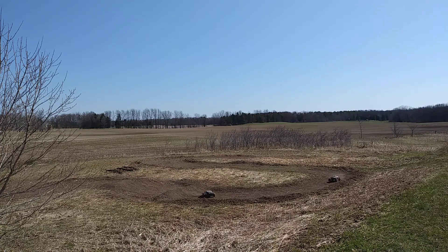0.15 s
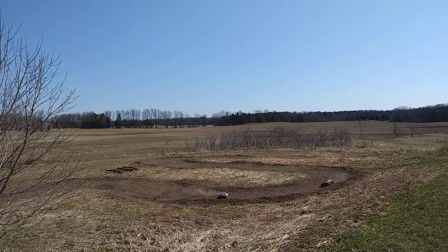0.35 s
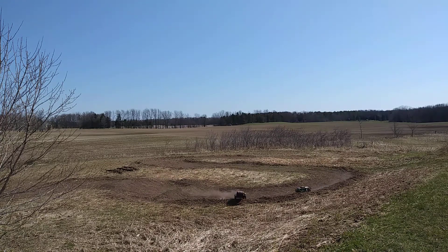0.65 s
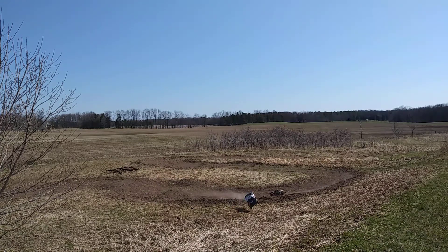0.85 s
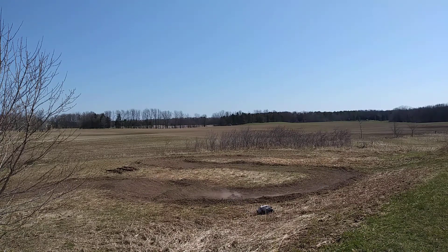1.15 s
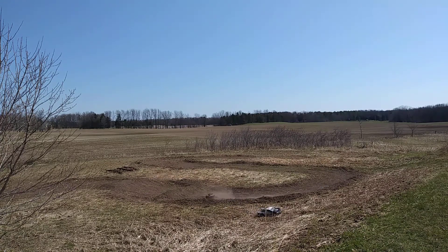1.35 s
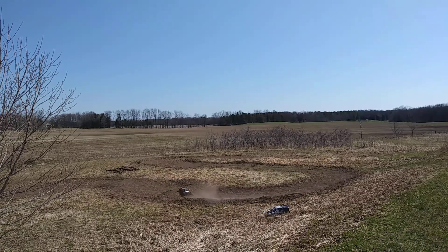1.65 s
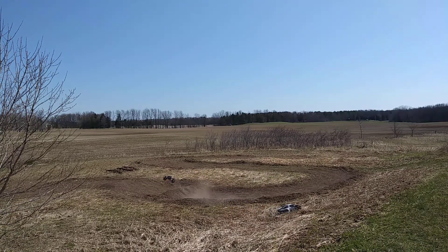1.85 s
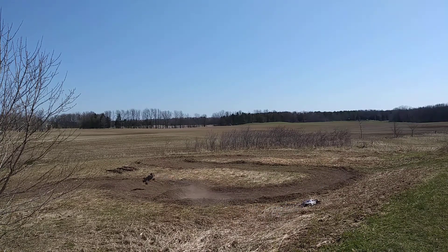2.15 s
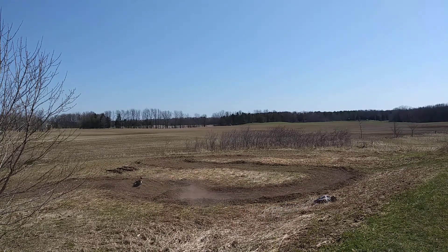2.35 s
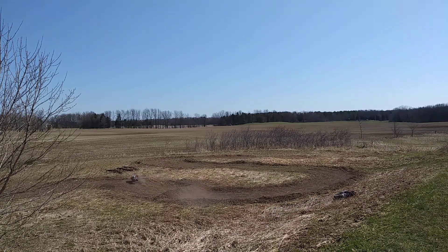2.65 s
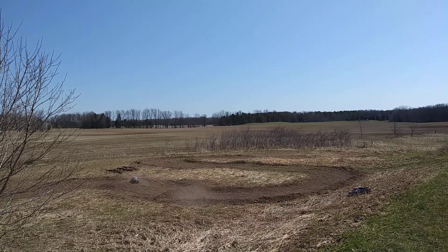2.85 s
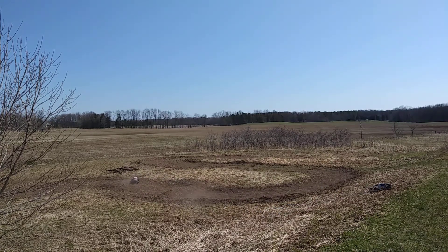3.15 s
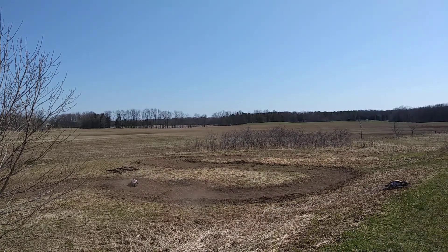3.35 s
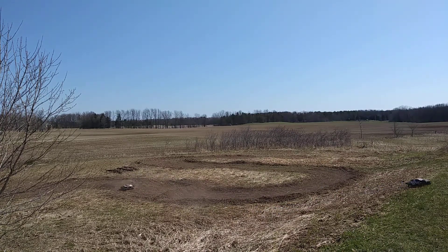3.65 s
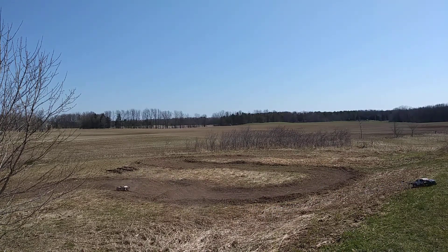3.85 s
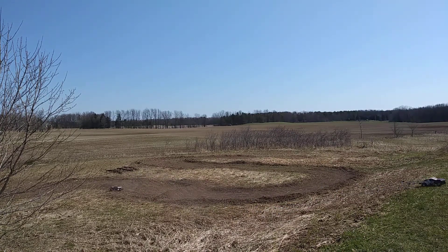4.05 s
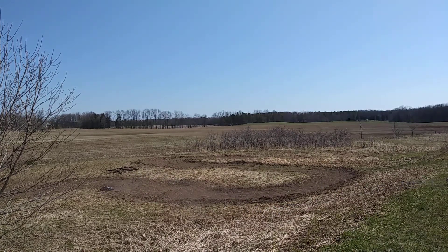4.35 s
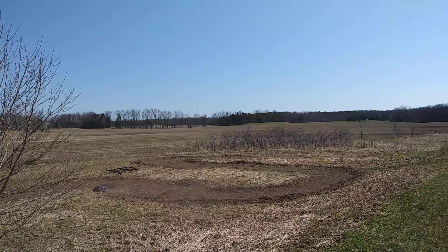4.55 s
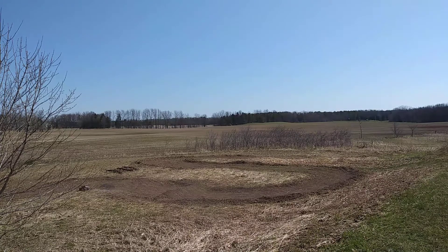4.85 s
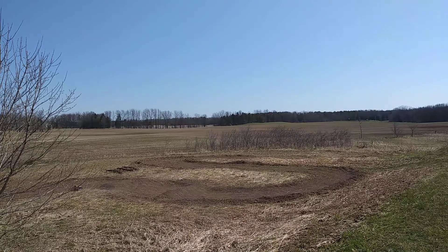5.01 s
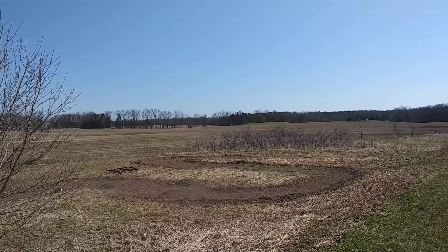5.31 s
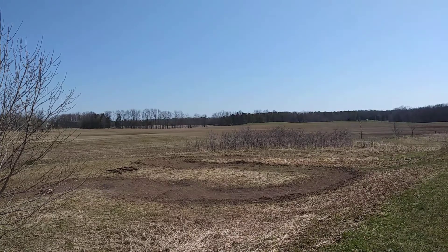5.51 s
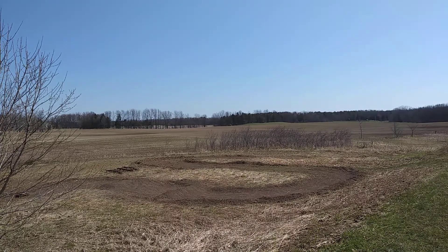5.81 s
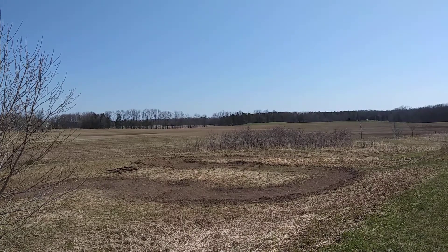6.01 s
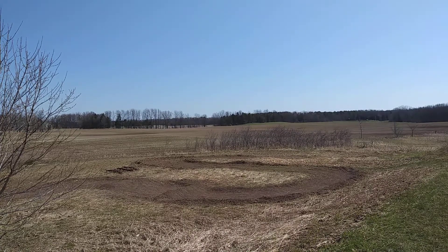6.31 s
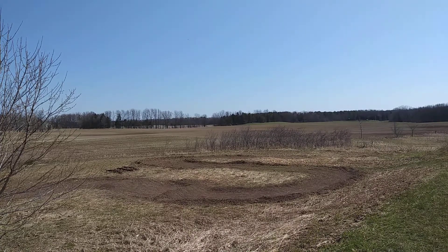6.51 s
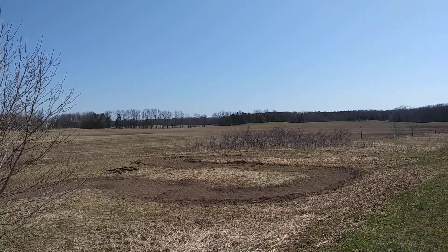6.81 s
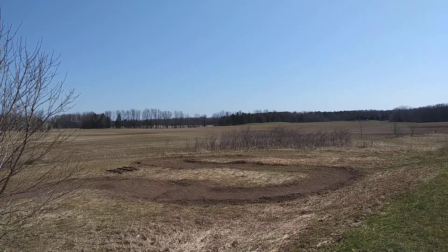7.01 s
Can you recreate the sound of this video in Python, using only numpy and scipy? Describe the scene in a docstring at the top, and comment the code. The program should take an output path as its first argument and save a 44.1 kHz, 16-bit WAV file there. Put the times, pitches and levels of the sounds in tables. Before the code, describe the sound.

Two small electric trucks race on dirt in an open field, heard from some way off. Gear chatter and tyre roar swell to a rattling hard landing just after half a second, then wheelspin, scraping and broken motor whines come and go. Wind thumps a hand-held microphone; a songbird whistles in the gaps. The trucks thin out and fade to near silence.

```python
"""Two small electric trucks race round a dirt track in an open field, some way from a hand-held microphone.
Drivetrains, tyres, thrown soil and landings are coloured noise; whine, hum and throttle blips are gliding
sines; howl is narrow noise. A songbird whistles in gliding sines. Low noise bursts and ringing clicks
make the wind on the microphone, over a faint hush of the field."""
import sys
import numpy as np
from scipy import signal
from scipy.fft import rfft, irfft, next_fast_len
from scipy.io import wavfile
from scipy.ndimage import uniform_filter1d

SR = 44100
rng = np.random.default_rng(int(sys.argv[2]) if len(sys.argv) > 2 else 0)


def volts_from_decibels(level):
    """Turn decibel levels (scalar or array-like) into linear amplitude factors."""
    exponent = np.asarray(level, float) / 20
    return 10 ** exponent


def unload_wav(signal):
    """Save mono or channel-first audio to the path in sys.argv[1] as 16-bit WAV at rate SR, clipped to [-1, 1]."""
    wavfile.write(
        sys.argv[1],
        SR,
        np.round(np.clip(np.atleast_2d(signal).T, -1, 1) * 32767).astype(np.int16),
    )


N = 316183


def rms_one(x):
    """Scale to rms 1."""
    return x / np.sqrt(np.mean(x ** 2) + 1e-20)


def in_time(rows):
    """Interpolate the columns of a curve, sample by sample."""
    time_s, *columns = np.transpose(rows)
    return [np.interp(np.arange(N) / SR, time_s, column) for column in columns]


def drift(rate_hz):
    """Slow random signal, rms 1: noise through a double pole at rate_hz, one value per 40 samples."""
    r = np.exp(-80 * np.pi * rate_hz / SR)
    noise = rng.standard_normal(N // 40 + 2002)
    slow = signal.lfilter([1], [1, -2 * r, r * r], noise)[2000:]
    return np.interp(np.arange(N) / 40, np.arange(len(slow)), rms_one(slow))


def grains(per_s, spread_db, smooth):
    """Random clicks of uneven size over smooth noise."""
    sizes = volts_from_decibels(spread_db * np.minimum(rng.exponential(1, N), 5))
    sizes = sizes * rng.choice([-1, 1], N)
    clicks = sizes * (rng.random(N) < per_s / SR)
    return rms_one(clicks) + smooth * rng.standard_normal(N)


def coloured(x, spectrum, patchy_db, rate_hz, per_octave=5):
    """Shape x by spectrum in narrow bands, each with its own level flicker; rms 1."""
    hz, db = np.transpose(spectrum)
    size = next_fast_len(N)
    f = np.fft.rfftfreq(size, 1 / SR)
    shaped = rfft(x, size) * volts_from_decibels(np.interp(np.log(f + 1), np.log(hz), db, left=-90, right=-90))
    place = per_octave * np.log2((f + 1) / hz[0])
    out = 0
    for k in range(int(per_octave * np.log2(hz[-1] / hz[0])) + 2):
        window = np.cos(np.pi / 2 * np.clip(place - k, -1, 1)) ** 2
        band = irfft(shaped * window, size)[:N]
        out = out + band * volts_from_decibels(patchy_db * drift(rate_hz))
    return rms_one(out)


def resonance(x, hz, width_hz):
    """Two-pole resonance, gain 1 on top."""
    r = np.exp(-np.pi * width_hz / SR)
    poles = [1, -2 * r * np.cos(2 * np.pi * hz / SR), r * r]
    return signal.lfilter(np.array([1, 0, -1]) * (1 - r * r) / 2, poles, x)


def bursts(rows):
    """Sum of Gaussian envelopes; half_s is the standard deviation."""
    out = np.zeros(N)
    for time_s, db, half_s in rows:
        at = np.arange(max(int((time_s - 6 * half_s) * SR), 0), min(int((time_s + 6 * half_s) * SR), N))
        out[at] += volts_from_decibels(db) * np.exp(-.5 * np.abs((at / SR - time_s) / half_s) ** 2)
    return out


def tones(tables, wobble, rate_hz, flutter_db, edge_s):
    """Gliding sines with unsteady pitch and level, faded at both ends."""
    out = np.zeros(N)
    shake = 1 + wobble * drift(rate_hz)
    flutter = volts_from_decibels(2 * flutter_db * np.tanh(drift(rate_hz) / 2))
    for rows in tables:
        time_s, hz, db = np.transpose(rows)
        at = np.arange(max(int(time_s[0] * SR), 0), min(int(time_s[-1] * SR), N))
        t = at / SR
        fade = np.clip(np.minimum(t - time_s[0], time_s[-1] - t) / edge_s, 0, 1)
        phase = 2 * np.pi * np.cumsum(np.interp(t, time_s, hz) * shake[at]) / SR
        level = np.sqrt(2) * volts_from_decibels(np.interp(t, time_s, db))  # table levels are rms
        out[at] += level * fade * flutter[at] * np.sin(phase)
    return out


GLIDE_EASE = 0.476  # share of a glide done at half its length


def glides(rows, change_db):
    """Turn (start, length, from, to, level) rows into three-point curves for tones()."""
    curves = []
    for start_s, length_s, from_hz, to_hz, db in rows:
        middle_hz = from_hz + GLIDE_EASE * (to_hz - from_hz)
        curves.append([(start_s, from_hz, db),
                       (start_s + length_s / 2, middle_hz, db + change_db / 2),
                       (start_s + length_s, to_hz, db + change_db)])
    return curves


# near shell and ground echo: (frequency [Hz], relative density [dB per Hz])
NEAR_SPECTRUM = [(760, -14.5), (1300, -3), (1660, -1.5), (1900, 7), (2260, -0.5), (2500, 5.5), (2790, -0.5),
                 (3750, -6), (4200, -38.5), (5460, -32.5), (9240, -120)]


def near_drivetrain():
    """Grainy gear chatter in the colour of the shell and its ground echo."""
    return coloured(grains(2500, spread_db=0.0, smooth=0.94), NEAR_SPECTRUM, patchy_db=3.3, rate_hz=8.0, per_octave=10)


# far shell and ground echo: (frequency [Hz], relative density [dB per Hz])
FAR_SPECTRUM = [(500, -33.5), (740, 5.5), (1000, -17.5), (1350, -1.5), (1650, -4), (1950, -37.5),
                (2400, -8), (2750, 0.5), (3300, 3), (3700, -13), (4100, -6), (4600, -19), (5200, -33.5),
                (6000, -41)]


def far_drivetrain():
    """Smooth noise in the colour of the far shell, with fast level chatter."""
    body = coloured(rng.standard_normal(N), FAR_SPECTRUM, patchy_db=4.5, rate_hz=11.2, per_octave=10)
    return body * volts_from_decibels(1.72 * drift(49))


# tyre roar: (frequency [Hz], relative density [dB per Hz])
TYRE_SPECTRUM = [(260, -53.5), (450, -25), (628, 8), (863, 2.5), (997, 8.5), (1450, -6.5), (1700, 2.5),
                 (2210, -48.5), (3740, -120)]


def tyre_roar():
    """Tyres on dirt: sparse grains under dense noise."""
    return coloured(grains(690, spread_db=-3.5, smooth=5.2), TYRE_SPECTRUM, patchy_db=3.5, rate_hz=7.2, per_octave=6)


# wheels spin up and fling grit: (start [s], end [s], level at end [dB])
SPINS = [(0.0, 0.31, -65.5), (0.557, 0.69, -64), (1.63, 2.136, -54.5), (2.383, 2.405, -61),
         (2.538, 2.622, -66), (2.72, 2.75, -62), (2.815, 2.887, -62), (3.315, 3.386, -63),
         (3.45, 3.44, -83), (4.11, 4.154, -57.5), (4.18, 4.396, -61), (6.568, 6.654, -59),
         (6.754, 6.763, -71)]
SPIN_RISE_DB_PER_S, SPIN_BUILD_DB_PER_S, SPIN_FALL_DB_PER_S = 261, 12, 422.5


def wheelspin():
    """Grit envelope: each spin rises quickly, builds slowly to its end and falls away."""
    t = np.arange(N) / SR
    out = 0
    for start_s, end_s, db in SPINS:
        lost_db = SPIN_RISE_DB_PER_S * np.maximum(start_s - t, 0)
        lost_db = lost_db + SPIN_BUILD_DB_PER_S * np.maximum(end_s - t, 0)
        lost_db = lost_db + SPIN_FALL_DB_PER_S * np.maximum(t - end_s, 0)
        out = out + volts_from_decibels(db - lost_db)
    return out


# coarse soil, fine grit: (frequency [Hz], relative density [dB per Hz])
SPRAY_SPECTRUM = [(2060, -41), (3500, 3), (3750, 1.5), (4280, -3), (4700, -2), (5250, -4), (5660, -9),
                  (6270, -18.5), (7200, -50.5), (9360, -56), (15800, -120)]
GRIT_SPECTRUM = [(4000, -28.5), (6800, 4.5), (7400, 2.5), (8130, -4.5), (9240, -11), (10100, -13.5),
                 (11100, -11), (12000, -17.5), (15500, -25)]
SPRAY_NEAR_DB, SPRAY_FAR_DB, GRIT_NEAR_DB = -22, -12.5, -32.5  # against each drivetrain
SPIN_SPRAY_DB = 8.5  # against the spin grit


def thrown_soil(near_db, far_db):
    """Impacts of soil and grit, following the drivetrains and the wheelspin."""
    spin = wheelspin()
    thrown = grains(4000, spread_db=4.0, smooth=2.0)
    spray = coloured(thrown, SPRAY_SPECTRUM, patchy_db=1.5, rate_hz=4.9, per_octave=12)
    grit = coloured(thrown, GRIT_SPECTRUM, patchy_db=2.5, rate_hz=6, per_octave=16)
    grit = grit * volts_from_decibels(1.2 * drift(25))  # thrown in clumps
    spray_level = volts_from_decibels(near_db + SPRAY_NEAR_DB) + volts_from_decibels(far_db + SPRAY_FAR_DB) + volts_from_decibels(SPIN_SPRAY_DB) * spin
    grit_level = volts_from_decibels(near_db + GRIT_NEAR_DB) + spin
    return spray * spray_level + grit * grit_level


# levels before the shake: (time [s], near drivetrain [dB], far drivetrain [dB], tyre roar [dB])
TRUCK_LEVELS = [(0.0, -40.5, -46.5, -41), (0.5, -37, -48.5, -47), (0.64, -34, -49, -42.5),
                (0.74, -34, -46, -42.5), (1.0, -42, -47, -50), (1.42, -43, -47.5, -49),
                (1.62, -40.5, -42, -37.5), (2.05, -36.5, -54.5, -41.5), (2.23, -43.5, -46, -45),
                (2.8, -48, -58, -44.5), (3.11, -49.5, -52, -51.5), (3.37, -40.5, -42, -46),
                (3.57, -60.5, -57, -61.5), (3.75, -54, -66, -58), (3.95, -43.5, -45.5, -43),
                (4.39, -45.5, -47.5, -50.5), (4.8, -47, -51.5, -51.5), (5.1, -60.5, -60, -66.5),
                (5.57, -50, -49.5, -54), (5.87, -46, -46.5, -53.5), (6.23, -52.5, -47, -62),
                (6.63, -47, -43.5, -47.5), (6.85, -51, -46, -56.5), (7.05, -63.5, -63.5, -62.5),
                (7.17, -70, -62, -65.5)]


def rolling():
    """Rough ground shakes drivetrains, tyres and thrown soil together."""
    near_db, far_db, tyre_db = in_time(TRUCK_LEVELS)
    shake = volts_from_decibels(1.4 * drift(38))
    drivetrains = volts_from_decibels(near_db) * near_drivetrain() + volts_from_decibels(far_db) * far_drivetrain()
    return shake * (drivetrains + volts_from_decibels(tyre_db) * tyre_roar() + thrown_soil(near_db, far_db))


# throttle held, then even throttle; levels before flutter: (time [s], pitch [Hz], level [dB])
WHINE = [
    [(0.08, 1850, -53), (0.14, 1770, -36), (0.2, 1737, -36), (0.26, 1850, -54), (0.42, 1850, -40),
     (0.52, 1770, -46)],
    [(1.73, 1872, -45), (1.78, 1792, -42), (1.85, 1890, -44), (1.95, 1960, -55), (2.045, 1860, -45),
     (2.095, 2050, -42)],
    [(2.53, 1916, -40), (2.56, 1800, -52), (2.588, 2130, -42), (2.603, 1922, -60), (2.622, 2080, -36),
     (2.655, 1482, -51), (2.705, 1940, -45.5), (2.745, 2050, -41.5), (2.785, 1837, -49.5),
     (2.838, 2170, -43), (2.9, 2150, -52)],
    [(3.25, 1388, -49), (3.29, 1980, -49), (3.315, 2080, -34), (3.335, 2220, -43), (3.37, 2420, -52)],
    [(3.29, 3070, -44), (3.305, 2950, -44), (3.322, 3170, -43), (3.342, 2740, -45)],
    [(4.01, 1981, -54), (4.065, 1883, -45), (4.12, 2330, -45), (4.18, 2740, -43), (4.28, 2100, -44),
     (4.31, 2420, -45), (4.39, 2280, -45), (4.41, 2000, -28)],
]
STEADY_WHINE = [
    [(4.485, 1502, -57), (4.515, 1948, -36), (4.58, 1926, -35.5), (4.6, 2040, -58), (4.61, 1880, -51),
     (4.655, 1905, -48)],
    [(4.745, 1980, -50), (4.772, 1858, -35), (4.79, 1980, -35), (4.805, 2060, -49), (4.835, 2010, -43),
     (4.875, 1860, -50)],
]


def gear_whine():
    """Gear mesh tones; the teeth mesh unevenly except at an even throttle."""
    held = tones(WHINE, wobble=0.024, rate_hz=90, flutter_db=3.5, edge_s=0.006)
    held = held * (0.8 + 0.6 * drift(70))
    return held + tones(STEADY_WHINE, wobble=0.014, rate_hz=45, flutter_db=1.8, edge_s=0.006)


# levels before flutter: (start [s], length [s], from [Hz], to [Hz], start level [dB])
BLIPS = [(0.52, 0.063, 3130, 3180, -40), (3.11, 0.056, 3180, 3400, -50), (0.7, 0.064, 1705, 1220, -42),
         (1.525, 0.065, 1486, 2250, -44), (1.6, 0.022, 3000, 3320, -38.5),
         (1.632, 0.026, 3500, 4050, -43.5), (2.62, 0.018, 3520, 3120, -50), (2.66, 0.039, 3170, 3620, -52),
         (3.15, 0.075, 1730, 2340, -44), (3.243, 0.04, 2850, 2420, -43)]


def throttle_blips():
    """Short blips of the throttle sweep the whine."""
    return tones(glides(BLIPS, change_db=-2), wobble=0.016, rate_hz=70, flutter_db=3.0, edge_s=0.005)


# gearbox under load, levels before flutter: (time [s], centre [Hz], level [dB])
HOWL = [
    [(0.0, 4770, -47), (0.15, 4540, -55), (0.3, 4900, -57)],
    [(0.05, 2990, -47), (0.2, 3350, -52), (0.3, 3200, -53)],
    [(1.45, 3090, -46), (1.62, 3145, -43), (1.78, 3100, -42)],
    [(1.7, 2800, -39), (1.87, 2700, -44), (2.03, 2610, -47), (2.17, 2550, -42)],
    [(1.75, 3450, -50), (1.95, 3710, -40), (2.2, 3720, -63)],
    [(1.62, 5000, -59), (1.8, 5060, -48), (2.02, 5300, -56), (2.15, 5140, -61)],
    [(5.7, 5100, -68), (5.9, 5140, -56.5), (6.1, 5220, -61), (6.3, 5100, -77)],
    [(5.3, 3280, -55.5), (5.7, 3230, -61), (6.1, 3390, -75), (6.45, 3370, -50)],
    [(5.7, 2890, -53), (5.95, 2783, -46.5), (6.13, 2820, -42.5), (6.25, 3003, -54.5), (6.4, 3150, -43.5),
     (6.5, 2940, -53), (6.7, 3000, -51)],
    [(5.75, 2470, -53), (5.87, 2550, -44), (5.98, 2420, -54)],
    [(5.55, 1063, -56.5), (5.85, 1160, -54.5), (6.1, 1354, -60), (6.35, 1368, -60)],
]
HOWL_WIDTH_SHARE = .075  # modulation rate against the first centre frequency


def howl():
    """Rough bands: a gliding tone times slow noise gives narrow noise about a moving centre."""
    out = 0
    for band in HOWL:
        centre = tones([band], wobble=0.00654, rate_hz=24.6, flutter_db=1.5, edge_s=0.029)
        out = out + centre * drift(HOWL_WIDTH_SHARE * band[0][1])
    return out


# levels before flutter: (time [s], pitch [Hz], level [dB])
HUM = [
    [(6.0, 698, -58), (6.3, 746.6, -53), (6.5, 775, -72), (6.9, 778, -69)],
]


def far_hum():
    """Low unsteady hum of the far truck."""
    return tones(HUM, wobble=0.0286, rate_hz=52.0, flutter_db=5.5, edge_s=0.025)


# landings: (time [s], rattle level [dB], Gaussian deviation [s])
BUMPS = [(.595, -26.5, 0.009), (0.635, -23.5, 0.012), (0.67, -24.5, 0.011), (0.694, -28.5, 0.0036),
         (0.754, -32, 0.012), (0.961, -36, 0.022), (1.14, -38, 0.015)]
# shell rattle: (frequency [Hz], relative density [dB per Hz])
RATTLE_SPECTRUM = [(500, -15), (900, -24), (1550, -39), (1750, 6.5), (2100, 3), (2400, 0), (2800, 0.5),
                   (3100, -14), (4700, -18), (9000, -43)]
# stones hitting the shell: (time [s], level [dB], Gaussian deviation [s])
STONES = [(2.368, -34.5, 0.0015)]
CRACK_DB = -21  # stones cracking under a landing, against the rattle


def landings():
    """Landings rattle the shell and crack stones; a stone hits the shell."""
    rattle = coloured(grains(3000, spread_db=2.5, smooth=0.9), RATTLE_SPECTRUM, patchy_db=1.0, rate_hz=10, per_octave=3)
    crack = rms_one(resonance(resonance(rng.standard_normal(N), 3900, 2800), 3900, 2800))
    return bursts(BUMPS) * (rattle + volts_from_decibels(CRACK_DB) * crack) + bursts(STONES) * crack


# chassis grounds out: (time [s], level [dB], Gaussian deviation [s])
SCRAPES = [(2.296, -32.5, 0.0054), (2.317, -36, 0.008), (2.35, -31.5, 0.005), (2.368, -35.5, 0.0084),
           (2.393, -33.5, 0.0087)]
# scrape: (frequency [Hz], relative density [dB per Hz])
SCRAPE_SPECTRUM = [(500, -4), (900, 1.5), (1500, 0), (3000, -2.5), (4000, -12), (9000, -44)]


def scrapes():
    """Grainy noise bursts as the chassis drags on the ground."""
    noise = coloured(grains(2500, spread_db=2.5, smooth=0.6), SCRAPE_SPECTRUM, patchy_db=1.5, rate_hz=30, per_octave=2)
    return bursts(SCRAPES) * noise


def trucks():
    """Both trucks: rolling noise, gear tones and impacts."""
    gears = gear_whine() + throttle_blips() + howl() + far_hum()
    return rolling() + gears + landings() + scrapes()


# phrase notes: (time after phrase start [s], length [s], from [Hz], to [Hz], start level [dB])
PHRASE = [(0.0, 0.029, 2700, 3040, -39.5), (0.026, 0.039, 2774, 2726, -34.5),
          (0.076, 0.077, 2054, 1884, -48), (.152, .09, 2620, 2410, -45), (0.258, 0.06, 1880, 1770, -47.5)]
# phrase starts: (time [s], level offset [dB])
PHRASES = [(2.952, -3), (5.075, -2.5)]
# single whistles: (start [s], length [s], from [Hz], to [Hz], start level [dB])
WHISTLES = [(2.392, 0.077, 2540, 2630, -49), (3.58, .11, 2514, 2610, -47.5),
            (3.73, 0.047, 2250, 1790, -55.5)]
PHRASE_FADE_DB, WHISTLE_SWELL_DB = -4, 10  # level change over each note


def songbird():
    """Clear whistled notes with a soft echo from the hedge."""
    sung = []
    for start_s, offset_db in PHRASES:
        for after_s, length_s, from_hz, to_hz, db in PHRASE:
            sung.append((start_s + after_s, length_s, from_hz, to_hz, offset_db + db))
    curves = glides(sung, PHRASE_FADE_DB) + glides(WHISTLES, WHISTLE_SWELL_DB)
    notes = tones(curves, wobble=.001, rate_hz=40, flutter_db=.5, edge_s=.005)
    return notes + volts_from_decibels(-16.0) * np.roll(notes, int(.055 * SR))


# breeze before its random swing: (time [s], level [dB])
BREEZE = [(0.0, -46), (0.32, -47), (0.68, -41), (0.96, -54.5), (1.26, -54), (1.52, -47.5), (2.93, -55.5),
          (3.47, -58), (4.01, -48), (4.51, -52), (4.65, -51.5), (5.35, -62), (5.79, -52), (6.17, -65.5),
          (6.65, -66), (7.17, -73)]
# strongest eddies on the port, before EDDY_GAIN: (time [s], level [dB], Gaussian deviation [s])
BUFFETS = [(0.058, -26.5, 0.019), (0.1, -25, 0.0088), (0.131, -29.5, 0.0068), (0.184, -24, 0.0068),
           (0.27, -25.5, 0.0087), (0.469, -25.5, 0.011), (0.558, -26, 0.0048), (0.589, -29, 0.002),
           (0.62, -29, 0.0022), (0.811, -24.5, 0.013), (0.85, -24, 0.0088), (1.49, -27.5, 0.017),
           (1.496, -23, 0.0032), (1.905, -33.5, 0.015), (2.237, -30.5, 0.0056), (2.484, -28, 0.0068),
           (2.523, -29.5, 0.015), (2.608, -29, 0.0025), (3.072, -36, 0.0031), (3.108, -39, 0.018),
           (3.168, -30.5, 0.0031), (3.555, -40, 0.025), (3.608, -30.5, 0.0045), (3.63, -32.5, 0.032),
           (3.664, -24.5, 0.0037), (3.793, -29, 0.0018), (3.925, -23, 0.0074), (3.946, -19.5, 0.0069),
           (3.995, -27.5, 0.014), (4.036, -19, 0.0078), (4.079, -20.5, 0.02), (4.134, -32.5, 0.032),
           (4.141, -29, 0.0018), (4.329, -25, 0.011), (4.403, -25, 0.0036), (4.476, -18, 0.0023),
           (4.493, -23.5, 0.0064), (4.595, -29, 0.0083), (4.846, -38, 0.0028), (5.417, -32.5, 0.0038),
           (5.439, -35, 0.0093), (5.596, -39.5, 0.02), (5.649, -35, 0.02), (5.953, -35, 0.0035),
           (5.994, -36.5, 0.016), (6.532, -39.5, 0.011), (6.782, -44.5, 0.0041)]
# eddy: (frequency [Hz], relative density [dB per Hz])
EDDY_SPECTRUM = [(65, -61.5), (110, -19), (217, -2), (464, -4.5), (572, -14), (621, -13), (1800, -42),
                 (2340, -51.5), (3960, -120)]
EDDY_GAIN = 0.41
CORE_DB, CORE_SHARE = -6, 0.58  # hard core: level against the table, length against the whole
CORE_CUT_HZ = 273  # cores lack the lowest bass


def wind():
    """Lumpy low noise: a breeze, and sudden eddies that each have a short hard core."""
    lumps = coloured(rng.standard_normal(N), EDDY_SPECTRUM, patchy_db=-0.5, rate_hz=60, per_octave=2)
    lumps = lumps / np.sqrt(uniform_filter1d(lumps ** 2, size=300))  # every eddy carries its full strength
    hard = signal.sosfilt(signal.butter(2, CORE_CUT_HZ, "high", fs=SR, output="sos"), lumps)
    hard = hard / np.sqrt(uniform_filter1d(hard ** 2, size=120))
    breeze = volts_from_decibels(in_time(BREEZE)[0] + 12.3 * np.tanh(0.7 * drift(29)))
    cores = bursts((time_s, db + CORE_DB, CORE_SHARE * half_s) for time_s, db, half_s in BUFFETS)
    return lumps * (breeze + EDDY_GAIN * bursts(BUFFETS)) + hard * cores


def rumble():
    """Faint low resonant noise that follows the breeze."""
    low = resonance(resonance(rng.standard_normal(N), 90, 60), 90, 60)
    return volts_from_decibels(-40.5 + 0.29 * in_time(BREEZE)[0]) * low


# sharpest eddies on the port: (time [s], peak level [dB])
POPS = [(0.074, -15), (0.267, -14.5), (0.471, -16.5), (0.813, -18), (0.849, -11), (0.858, -18.5),
        (1.482, -20.5), (2.237, -27.5), (2.484, -23), (3.603, -20.5), (3.921, -23.5), (3.986, -24),
        (4.039, -16), (4.072, -13), (4.136, -19.5), (4.326, -24), (4.397, -25), (4.471, -24), (5.417, -34)]
POP_HZ, POP_WIDTH_HZ = 445, 335  # each of two resonances in series


def pops():
    """One soft push each, ringing for a cycle or two."""
    time_s, db = np.transpose(POPS)
    clicks = np.zeros(N)
    clicks[(time_s * SR).astype(int)] = volts_from_decibels(db) * rng.choice([-1, 1], len(time_s))
    unit = np.zeros(SR // 20)
    unit[0] = 1
    ring = resonance(resonance(unit, POP_HZ, POP_WIDTH_HZ), POP_HZ, POP_WIDTH_HZ)
    return signal.fftconvolve(clicks, ring / np.abs(ring).max())[:N]


# field hush: (frequency [Hz], relative density [dB per Hz])
FIELD_SPECTRUM = [(120, -38), (200, -24), (1450, -25), (1730, -14.5), (2740, -20), (3690, 20), (7000, -39),
                  (9100, -66), (15400, -120)]
FIELD_DB = -66.5


def field_hush():
    """Faint, nearly steady coloured noise."""
    return volts_from_decibels(FIELD_DB) * coloured(rng.standard_normal(N), FIELD_SPECTRUM, patchy_db=0.5, rate_hz=4.8, per_octave=2)


def scene():
    """All sources at the microphone, one channel."""
    return (trucks() + songbird() + wind() + pops() + field_hush())[None]


# port cancellation: (frequency [Hz], width [Hz])
PORT_NOTCHES = [(7130, 1800), (9550, 320)]


def port(x):
    """The port weakens two treble bands by subtracting most of each resonance."""
    for hz, width_hz in PORT_NOTCHES:
        x = x - 0.87 * resonance(x, hz, width_hz)
    return x


# learned noise: (centre [Hz], width [Hz], level per bin at LEARNED_AT_S [dB])
LEARNED = [(1268, 160, -80.5), (1380, 920, -69), (1770, 140, -94), (2250, 210, -78), (2550, 130, -55.5),
           (3850, 230, -73.5), (4150, 760, -85.5), (5570, 150, -99.5), (10500, 10000, -110)]
LEARNED_AT_S, LEARNING_DB_PER_S = 6.0, 1.8


def suppress(x, floor_db):
    """Noise suppressor: each bin loses its learned noise, which digs holes wherever the sound is weak."""
    hz, time_s, bins = signal.stft(x, SR, nperseg=1024, noverlap=768)
    power = uniform_filter1d(np.abs(bins) ** 2, size=13, axis=-1) + 1e-18
    learned = 0
    for centre_hz, width_hz, db in LEARNED:
        learned = learned + volts_from_decibels(db) ** 2 * np.exp(-(2 * (hz - centre_hz) / width_hz) ** 2)
    sure = volts_from_decibels(LEARNING_DB_PER_S * (time_s - LEARNED_AT_S)) ** 2  # the estimate firms up with time
    gain = np.sqrt(np.maximum(1 - learned[:, None] * sure / power, volts_from_decibels(floor_db) ** 2))
    return signal.istft(bins * gain, SR, nperseg=1024, noverlap=768)[1][..., :N]


HISS_DB, HISS_TOP_HZ = -83, 13200  # level before the low-pass; stopband edge


def converter_hiss():
    """White noise below a steep low-pass."""
    lowpass = signal.cheby2(14, 40, HISS_TOP_HZ, fs=SR, output="sos")
    return volts_from_decibels(HISS_DB) * signal.sosfilt(lowpass, rng.standard_normal(N))


def band_limit(x):
    """A steep low-pass at the top of the band."""
    return signal.sosfilt(signal.butter(12, 15630, fs=SR, output="sos"), x)


LOW_CUT_HZ = 185


def record(dry):
    """Port, low cut against the wind, suppressor; then rumble and converter hiss are added."""
    low_cut = signal.butter(4, LOW_CUT_HZ, "high", fs=SR, output="sos")
    cut = signal.sosfilt(low_cut, port(dry))
    cleaned = suppress(cut, floor_db=-14)
    mix = cleaned + rumble() + converter_hiss()
    return band_limit(mix)


dry = scene()
out = record(dry)
unload_wav(out)
```